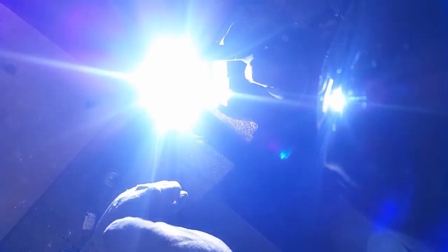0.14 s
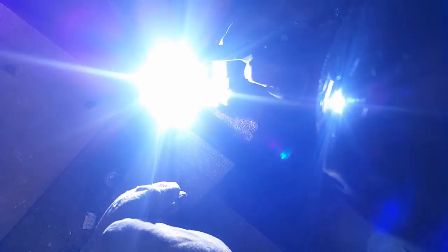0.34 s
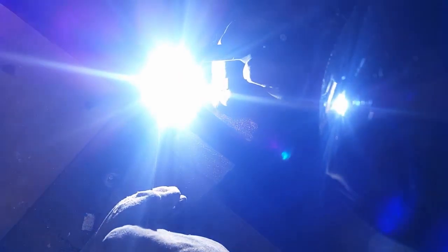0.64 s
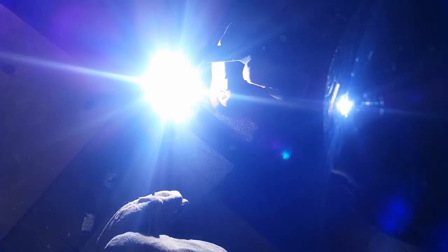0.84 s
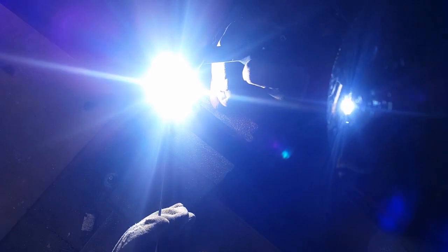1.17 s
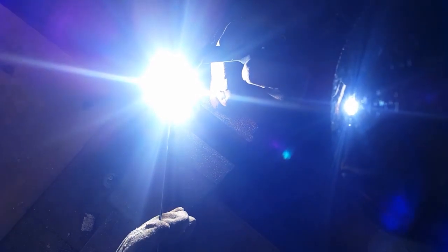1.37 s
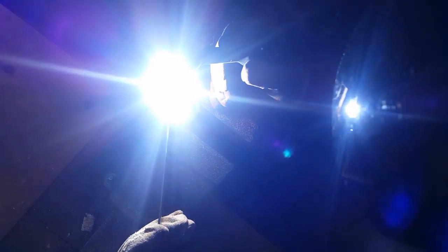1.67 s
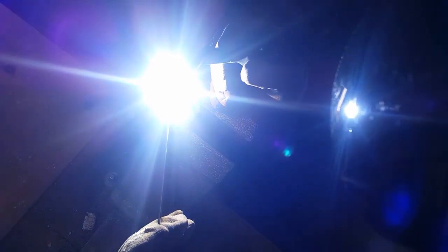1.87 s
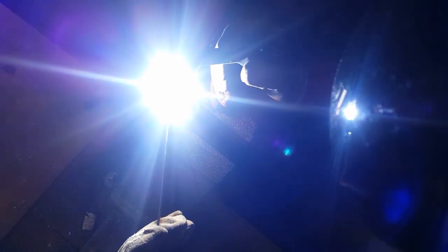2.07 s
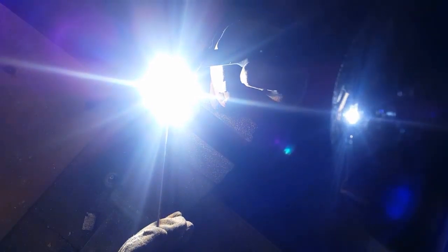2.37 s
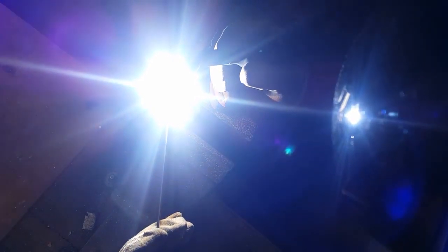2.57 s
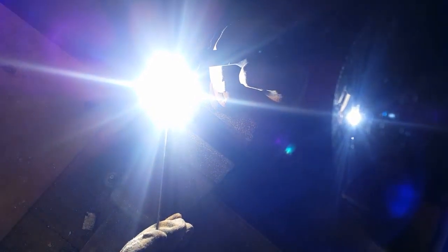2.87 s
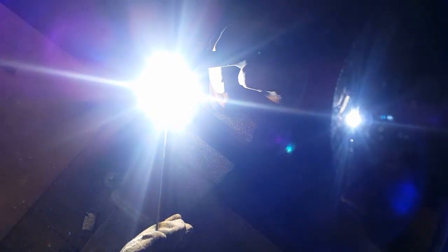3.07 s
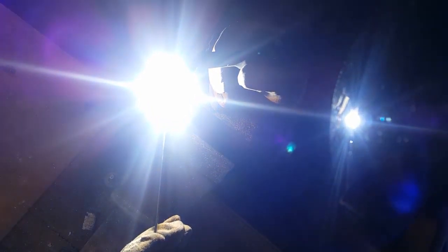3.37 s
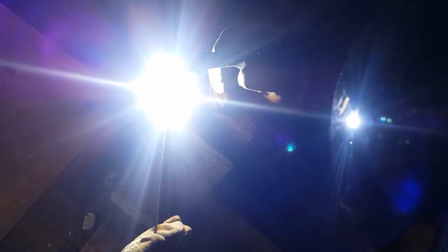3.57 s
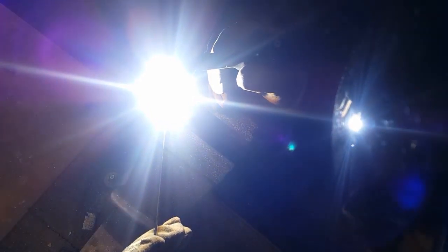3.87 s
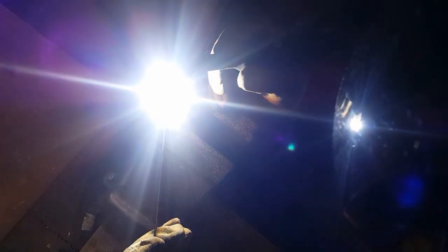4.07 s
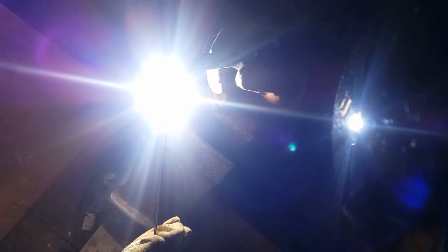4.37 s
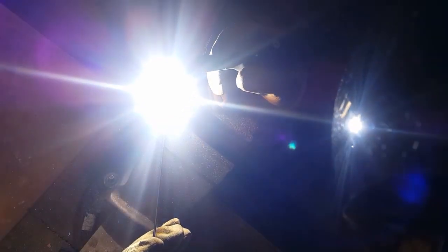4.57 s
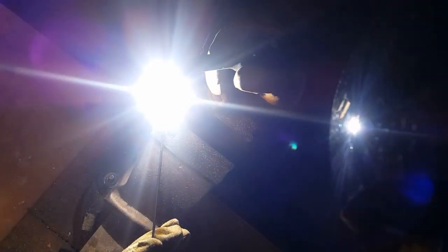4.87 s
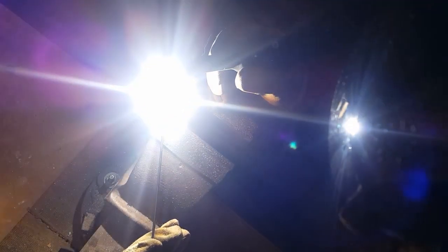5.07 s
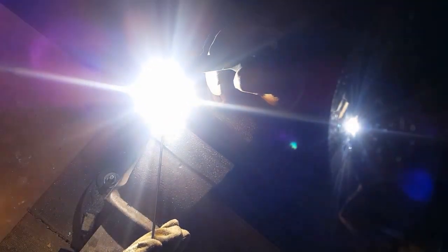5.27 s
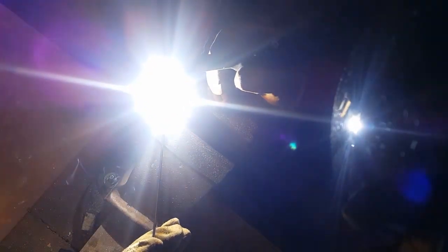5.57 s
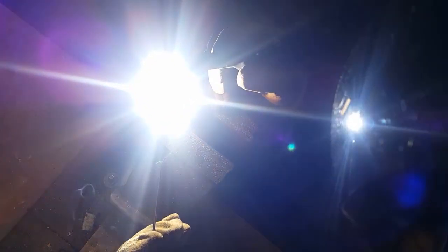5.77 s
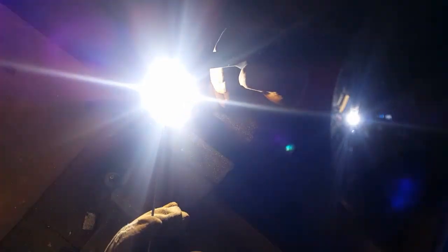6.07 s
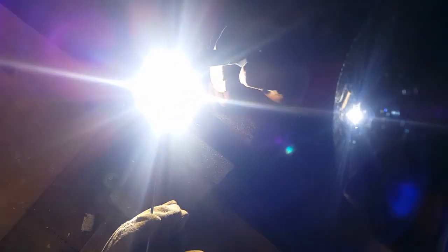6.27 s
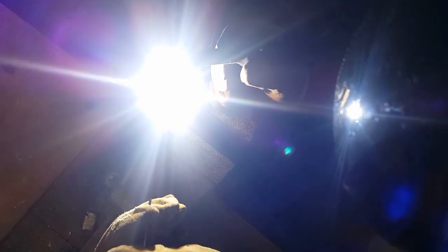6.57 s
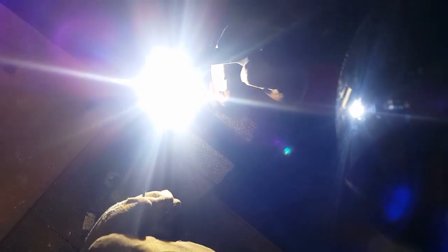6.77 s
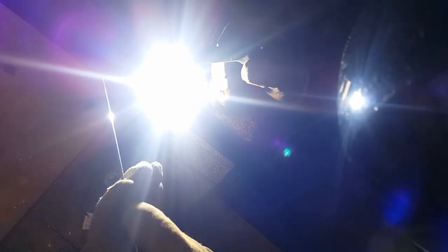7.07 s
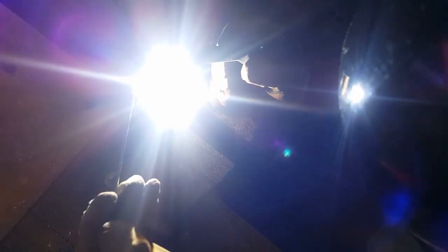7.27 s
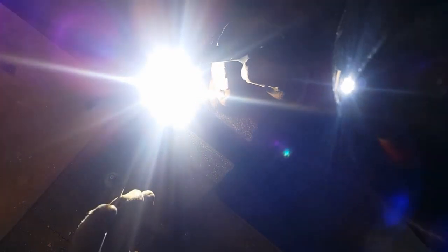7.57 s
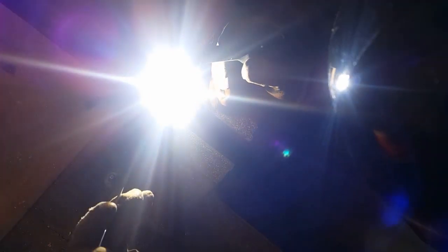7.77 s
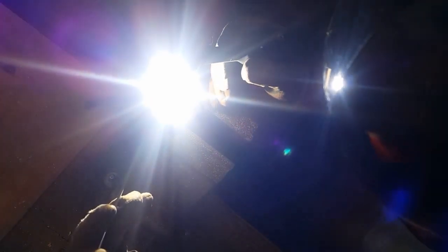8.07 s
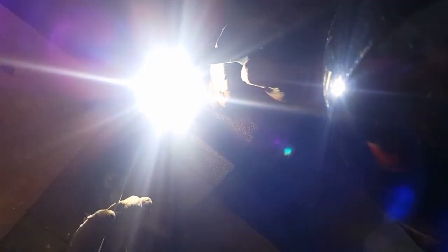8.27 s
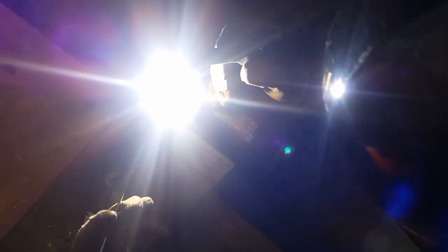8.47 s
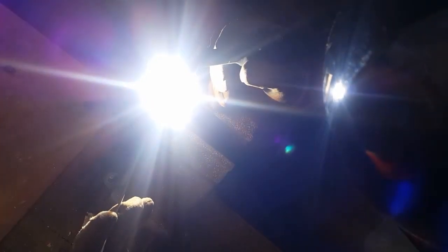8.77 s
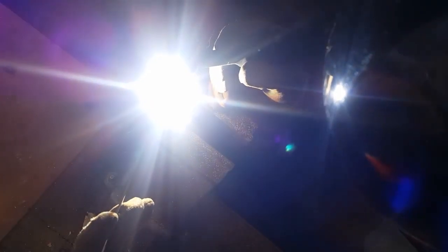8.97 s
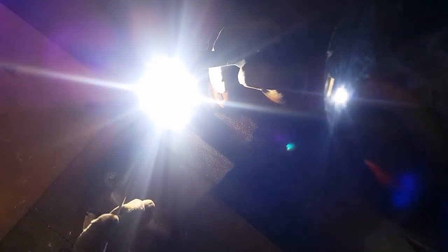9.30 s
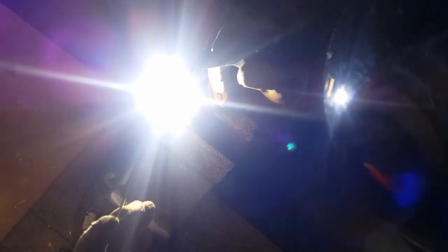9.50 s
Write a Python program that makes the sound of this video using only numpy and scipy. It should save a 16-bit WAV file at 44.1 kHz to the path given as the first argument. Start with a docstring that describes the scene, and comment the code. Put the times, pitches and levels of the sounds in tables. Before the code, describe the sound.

A TIG welding arc on aluminium buzzes close by in a workshop from the first moment to the last, nearly ten seconds. The buzz is hard, bright and electric, steady in pitch, with a metallic rasp and a constant hiss of gas. It swells to its fiercest at about 0.4 seconds. Under it, during the first 0.7 seconds, are a low hum and a few soft, dull bumps; after that the bass sinks to a faint, uneven flutter. The arc gradually calms and is softest and slightly hollow from about 5 to 6 seconds. Just after 6 seconds the molten metal gives one short, rough sputter. By about 6.5 seconds the buzz and sizzle have picked up again, and they carry on evenly to the end.

```python
"""An AC TIG arc buzzes on aluminium, close by in a workshop. The current reverses twice a cycle and
each reversal snaps like a tiny spark: a hard, bright buzz that the bench and walls scatter.
The arc hisses between the snaps; a low hum and a few soft bumps open the scene, then the bass sinks
and flutters. One control, how fiercely the arc burns, rides sizzle, rasp, hiss and bass: the arc
calms towards the middle, sputters once and picks up again."""
import sys
import numpy as np
from scipy import signal
from scipy.fft import rfft, irfft, next_fast_len
from scipy.io import wavfile
from scipy.ndimage import uniform_filter1d

SR = 44100
rng = np.random.default_rng(int(sys.argv[2]) if len(sys.argv) > 2 else 0)


def int16_out(signal):
    """Quantize to a 16-bit WAV file."""
    q = np.round(np.clip(np.atleast_2d(signal).T, -1, 1) * 32767)
    wavfile.write(sys.argv[1], SR, q.astype(np.int16))


N = 425124
ARC_HZ, TOP_HZ = 120.775, 15800
FIRST_SNAP_S = .00065
NEGATIVE_SHARE = .6972  # part of each cycle in which the electrode is negative


# body of the buzz as bench and room pass it, before the low cut: harmonic, left level/dB, right level/dB
BUZZ_BODY = [(1, -82.5, -94), (2, -69.5, -72), (3, -54, -54), (4, -57.5, -66), (5, -55, -70),
             (6, -43.5, -50), (7, -50, -39.5), (8, -70, -54), (9, -44.5, -42.5), (10, -49.5, -42),
             (11, -50, -52.5), (12, -67, -49), (13, -37.5, -36), (14, -40, -34), (15, -47, -85.5),
             (16, -43, -35.5), (17, -36.5, -39), (18, -47, -61), (19, -50, -52.5), (20, -38.5, -42),
             (21, -48, -39), (22, -48.5, -42), (23, -40.5, -43.5), (24, -44.5, -45), (25, -82, -61),
             (26, -41.5, -39.5), (27, -47.5, -43.5), (28, -57, -50), (29, -47, -48), (30, -49, -48)]
# treble EQ of one snap: f/Hz, left level/dB, right level/dB
SNAP_EQ = [(3440, -46, -46), (4190, -49, -52), (4780, -47, -45), (5330, -41.5, -54.5), (5880, -38, -41),
           (6140, -42.5, -52.5), (7660, -43, -47), (7350, -49, -57), (8460, -53.5, -51.5),
           (10200, -50, -51.5), (11900, -48, -50), (13100, -54, -53), (14500, -50, -53.5),
           (15700, -47.5, -55)]
# stereo image, as the lead of the left microphone: f/Hz, phase/rad
LEFT_LEAD = [(720, -1.33), (900, -0.8), (1200, -1), (1550, 0.95), (2100, 0.7), (3100, 0.5), (4800, 1),
             (5600, 1.8), (7200, 2), (8500, 1), (12000, 0.05), (14400, 2.5), (16000, 1.8)]

def buzz(t, waver_db=1.29, low_cut_hz=480):
    """The arc's train of snaps, built a cycle at a time as channels x harmonics x cycles."""
    hz = np.arange(1, int(TOP_HZ / ARC_HZ) + 1)[:, None] * ARC_HZ
    starts = np.arange(int(N / SR * ARC_HZ) + 2) / ARC_HZ
    shape = (2, len(hz), len(starts))
    partials = snaps(hz, starts) * reflections(hz, shape)
    # standing waves set the low harmonics one by one; higher up the snap's own colour rules
    gain = undb(spectrum(SNAP_EQ, hz))
    count = len(BUZZ_BODY)
    body_mean = np.abs(partials[:, :count]).mean(axis=2, keepdims=True)
    gain[:, :count] = undb(np.transpose(BUZZ_BODY)[1:, :, None]) / body_mean
    ride_db = registers_db(hz, starts) + waver_db * drift(shape, 25.5, ARC_HZ)
    partials = partials * gain * undb(ride_db)
    partials /= np.hypot(1, (low_cut_hz / hz) ** 6)  # the snaps are too short to carry much bass
    partials[1] *= np.exp(-1j * spectrum(LEFT_LEAD, hz)[0])
    points = 2048  # per cycle
    cycles = irfft(np.pad(partials, ((0, 0), (1, 0), (0, 0))), points, axis=1) * points / np.sqrt(2)
    channels = cycles.transpose(0, 2, 1).reshape(2, -1)
    return np.array([np.interp(t * ARC_HZ * points, np.arange(len(c)), c) for c in channels])


def snaps(hz, starts, second_db=-2.5, scatter_db=0.69, base_jitter_s=2.6e-6, suction_rad=0.48):
    """The arc relights at each reversal; the uneven spacing of the two snaps combs the harmonics."""
    size = undb(scatter_db * rng.standard_normal((2, len(starts))))
    # the fiercer the arc, the looser its timing
    late = base_jitter_s * rng.standard_normal((2, len(starts))) * undb(.75 * sizzle(starts))
    first = size[0] * np.exp(-2j * np.pi * hz * (FIRST_SNAP_S + late[0]))
    second = size[1] * np.exp(-2j * np.pi * hz * (FIRST_SNAP_S + NEGATIVE_SHARE / ARC_HZ + late[1]))
    # each snap is a push of air followed by a suction
    return (first + undb(second_db) * second) * np.exp(1j * suction_rad)


# steady metallic rings in the rasp: f/Hz, boost/dB
METAL_RINGS = [(3140, 9), (4830, 3), (5677, 1), (6039, 3), (6763, 1), (7247, 2), (10387, 2.5), (11594, 2.5),
               (11957, 1.5)]

def reflections(hz, shape, scramble_rad=0.48, sway_db=-17, sway_hz=3, ring_width_hz=50):
    """Echoes off bench and walls pile up, giving each harmonic its own phase and level."""
    turn, uneven_db = rng.standard_normal((2, *shape[:2], 1))
    apart = np.minimum(hz / 4000, 1)  # long waves reach both channels alike
    turn = apart * turn + np.sqrt(1 - apart ** 2) * rng.standard_normal(hz.shape)
    rings_db = sum(db * bell(hz, centre, ring_width_hz) for centre, db in METAL_RINGS)
    still = np.exp(1j * scramble_rad * turn) * undb(uneven_db + rings_db)
    # paths off the moving hands and torch change, the more so for short waves
    sway = drift(shape, sway_hz, ARC_HZ) + 1j * drift(shape, sway_hz, ARC_HZ)
    return still + undb(sway_db) * np.sqrt(hz / 8000) * sway


# master fader for how fiercely the arc burns: t/s, level/dB
SIZZLE_RIDE = [(0, 0.5), (.35, 5), (.8, 2.3), (1.25, 3), (2, 0.4), (2.5, 1.6), (3.1, -.5), (4.3, -1.7),
               (4.9, -3.5), (6, -3.4), (6.5, 0.4), (7.2, 1.5), (8.05, 0.8), (8.6, 0), (9.64, 0.1)]

def sizzle(t):
    """Fierceness of the arc in dB; a layer follows it by its own slope, in dB per dB."""
    return np.interp(t, *np.transpose(SIZZLE_RIDE))


def swell(t, peak_s=0.37, width_s=0.32):
    """The opening swell, 0 to 1."""
    return bell(t, peak_s, width_s)


def registers_db(hz, t, swell_db=2.4, choke_db=-2.5, choke_lag_s=.045, choke_s=0.088, wander_db=0.33):
    """Moving EQ: the body swells once and chokes after a sputter; bass, rasp and top follow the arc."""
    choke = choke_db * sum(bell(t, s + choke_lag_s, choke_s) for s, _, _ in POOL_SPUTTERS)
    body = swell_db * swell(t) + choke
    rasp = .5 + 0.36 * sizzle(t)
    low = np.clip((720 - hz) / 240, 0, 1)
    upper = np.clip((hz - 3200) / 2000, 0, 1)
    top = np.clip((hz - 7300) / 1800, 0, 1)
    db = body + low * sizzle(t) + upper * (rasp - body) + top * (sizzle(t) - rasp)
    return db + nasal_db(hz, t, upper) + hollow_db(hz, t) + wander_db * drift(t.shape, 3, ARC_HZ)


def nasal_db(hz, t, upper, centre_hz=1680, width_hz=260):
    """A nasal ring stands over its neighbours in the opening swell, then slowly sinks."""
    emphasis = 2.8 * swell(t) - 0.33 * t
    return emphasis * (bell(hz, centre_hz, width_hz) - 0.55 * (1 - upper))


def hollow_db(hz, t, notch_hz=7900, width_hz=2200, comb_hz=3600, below_db=-2.5, slope=0.57):
    """A calm arc turns slightly hollow: a notch between two peaks, as from a very short reflection."""
    depth = slope * np.minimum(sizzle(t) - below_db, 0)
    return depth * bell(hz, notch_hz, width_hz) * np.cos(2 * np.pi * (hz - notch_hz) / comb_hz)


# EQ of the gas hiss: f/Hz, left relative level/dB, right relative level/dB
HISS_EQ = [(400, -53, -58), (750, -51.5, -51.5), (1300, -52, -51.5), (1900, -48.7, -48.2),
           (3100, -48.5, -48.3), (3700, -51.6, -51.8), (4700, -49, -50), (5900, -46, -48),
           (7300, -47, -49.5), (8600, -49.7, -50.5), (12000, -49.5, -50.3), (13500, -51.6, -52.6),
           (15500, -51.8, -53)]

def hiss(t, base_db=-27, slope=0.55, rise_s=0.0017, tail_s=0.0013):
    """Plasma and shielding gas hiss, surging around each reversal."""
    surge = 1
    for share, size in ((0, 0.79), (NEGATIVE_SHARE, 0.66)):
        since = ((t - FIRST_SNAP_S) * ARC_HZ - share) % 1 / ARC_HZ
        surge = surge + size * (np.exp(-since / tail_s) + np.exp((since - 1 / ARC_HZ) / rise_s))
    flicker_db = -0.1 * drift((N,), 140, SR) + 0.77 * drift((N,), 39, SR)
    noise = unit(colour(rng.standard_normal((2, N)) * surge * undb(flicker_db), HISS_EQ, low_hz=680))
    # the airy top rises and falls with the sizzle, and flickers by itself
    air = colour(noise, [(7000, -40), (10000, 0)], low_hz=3000)
    air_db = 0.092 * sizzle(t) + .5 * drift((N,), 40, SR)
    return (noise + air * (undb(air_db) - 1)) * undb(base_db + slope * sizzle(t))


# spit from the weld pool: t/s, level/dB, half-width/s
POOL_SPUTTERS = [(6.125, -34.5, .022)]

def sputters(t):
    """A short, rough burst from the molten pool."""
    eq = [(700, -3), (2000, 0), (4000, -12), (12000, -30)]
    noise = unit(colour(rng.standard_normal((2, N)), eq, low_hz=600))
    return noise * sum(undb(db) * np.exp(-((t - s) / width) ** 2) for s, db, width in POOL_SPUTTERS)


# voicing of the hum: harmonic, relative level/dB
HUM_PARTIALS = [(1, -11.5), (2, -3.5), (3, 0), (4, -6), (5, -2)]
# spells in which its second harmonic stands out: start t/s, end t/s, base level/dB
HUM_DRONES = [(4.8, 5.957, -66.5), (8.93, 9.6, -67)]

def hum(t, opening_db=-47, opening_end_s=0.63, later_db=-63, slope=2.3, waver_db=2):
    """Low harmonics of the welding current, strong at first, then faint and following the arc."""
    opening = until(t, opening_end_s)
    level_db = opening * opening_db + (1 - opening) * (later_db + slope * sizzle(t))
    drone = sum(undb(db) * (until(t, end) - until(t, start)) for start, end, db in HUM_DRONES)
    out = 0
    for k, db in HUM_PARTIALS:
        size = (undb(level_db + db) + (k == 2) * drone) * undb(waver_db * drift((N,), 22, SR))
        out = out + np.sqrt(2) * size * np.sin(2 * np.pi * (k * ARC_HZ * t + rng.random()))
    return out


# soft bumps under the opening: t/s, level/dB, f/Hz
SOFT_BUMPS = [(.068, -48, 75), (.152, -46, 50), (.258, -40, 140), (.275, -45, 60), (.382, -48, 65),
              (.69, -49, 65)]

def bumps(t, decay_s=0.0062):
    """Dull, heavily damped thuds."""
    out = np.zeros(N)
    for s, db, hz in SOFT_BUMPS:
        age = np.maximum(t - s, 0)
        out += undb(db) * np.sin(2 * np.pi * hz * age) * age / decay_s * np.exp(1 - age / decay_s)
    return out


# EQ of the low bed: f/Hz, relative level/dB
RUMBLE_EQ = [(20, -12), (60, -6), (95, -2.5), (135, 0), (175, 0), (280, 1.5), (400, 1), (600, -1),
             (1000, -44)]

def rumble(t, base_db=-54, slope=1.3, swell_db=5, pops_per_s=45, pop_db=-1, width=0.88):
    """A wide, low rush under the arc, dotted with soft pops."""
    pops = (rng.random(N) < pops_per_s / SR) * rng.standard_normal((2, N))
    mid, side = rng.standard_normal((2, N)) + undb(pop_db) * unit(pops)
    noise = colour(mid + width * np.array([side, -side]), RUMBLE_EQ, low_hz=18)
    return unit(noise) * undb(base_db + slope * sizzle(t) + swell_db * swell(t))


def flutter(t, spread_db=3, slope=0.3, slow_hz=9, quick_hz=32):
    """After the opening the bass lifts and drops out unevenly, most when the arc is calm."""
    wobble = unit(drift((N,), slow_hz, SR) + drift((N,), quick_hz, SR))
    depth_db = (spread_db - slope * sizzle(t)) * (1 - swell(t))
    return undb(depth_db * np.minimum(wobble, 1))  # dips go further than lifts


def suppress(x, threshold_db=-70, floor_db=-15, centre_hz=161, width_hz=76):
    """A noise suppressor ducks bass bands whenever they fall under a threshold."""
    frames = dict(nperseg=2048, noverlap=1536)
    hz, _, bins = signal.stft(x, SR, **frames)
    power = uniform_filter1d((np.abs(bins) ** 2).mean(axis=0), size=3, axis=0)
    over = (power / undb(threshold_db) ** 2) ** 2
    gain = undb(floor_db * bell(hz[:, None], centre_hz, width_hz) / (1 + over))
    return signal.istft(bins * gain, SR, **frames)[1][:, :N]


def undb(db):
    """Decibels to gain."""
    return 10 ** (np.asarray(db) / 20)


def unit(x):
    """Scale to rms 1."""
    return x / np.sqrt(np.mean(x ** 2))


def bell(x, centre, width):
    """A smooth hump of height 1."""
    return np.exp(-.5 * ((x - centre) / width) ** 2)


def until(t, end_s, release_s=0.031):
    """1 up to end_s, then a quick fade to 0."""
    return np.clip(1 - (t - end_s) / release_s, 0, 1)


def spectrum(table, hz):
    """The columns of a frequency table, read on a log axis."""
    f, *columns = np.transpose(table)
    return np.array([np.interp(np.log(hz + 1e-9), np.log(f), c) for c in columns])


def colour(x, table, low_hz):
    """EQ by a table of f/Hz, level/dB, with a steep cut below low_hz."""
    size = next_fast_len(N, True)
    hz = np.fft.rfftfreq(size, 1 / SR)
    rise = (hz / low_hz) ** 4
    return irfft(rfft(x, size) * undb(spectrum(table, hz)) * rise / np.hypot(1, rise), size)[..., :N]


def drift(shape, rate_hz, step_hz):
    """Smooth random modulation of rms 1 along the last axis, sampled at step_hz."""
    size = next_fast_len(shape[-1], True)
    smoothing = np.exp(-(np.fft.rfftfreq(size, 1 / step_hz) / rate_hz) ** 2)
    return unit(irfft(rfft(rng.standard_normal(shape), size) * smoothing, size)[..., :shape[-1]])


def scene():
    """Buzz and hiss of the arc over the low sounds of the workshop."""
    t = np.arange(N) / SR
    return buzz(t) + hiss(t) + (rumble(t) + hum(t)) * flutter(t) + bumps(t) + sputters(t)


def record(dry):
    """Master chain: duck faint bass, soft-clip the tallest snaps and cut the top steeply."""
    clean = suppress(dry)
    rounded = clean / (1 + (clean / .95) ** 8) ** (1 / 8)
    high_cut = signal.firwin(801, TOP_HZ, fs=SR, window=("kaiser", 8))
    return signal.fftconvolve(rounded, high_cut[None], "same", axes=1)


dry = scene()
out = record(dry)
int16_out(out)
```